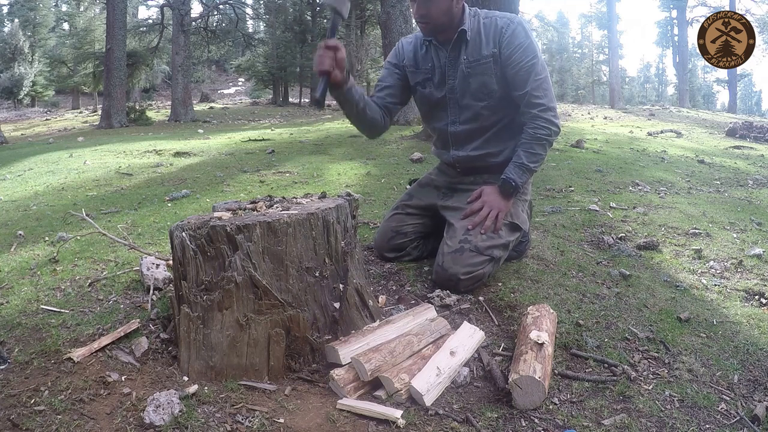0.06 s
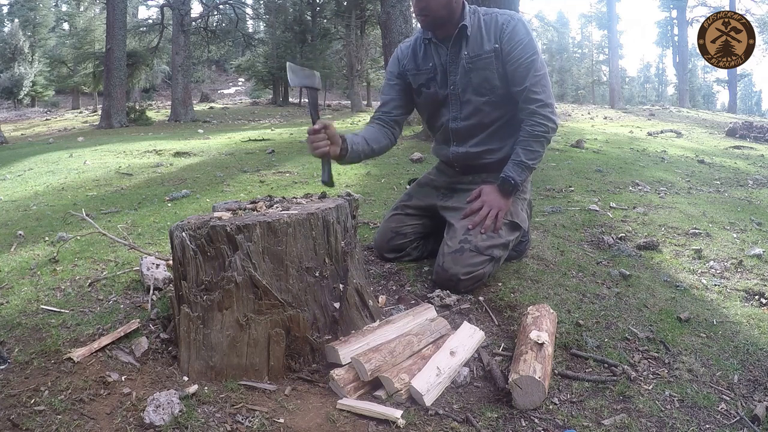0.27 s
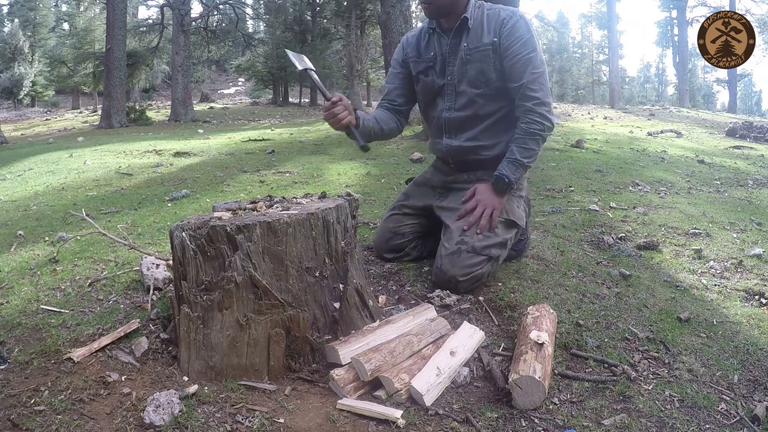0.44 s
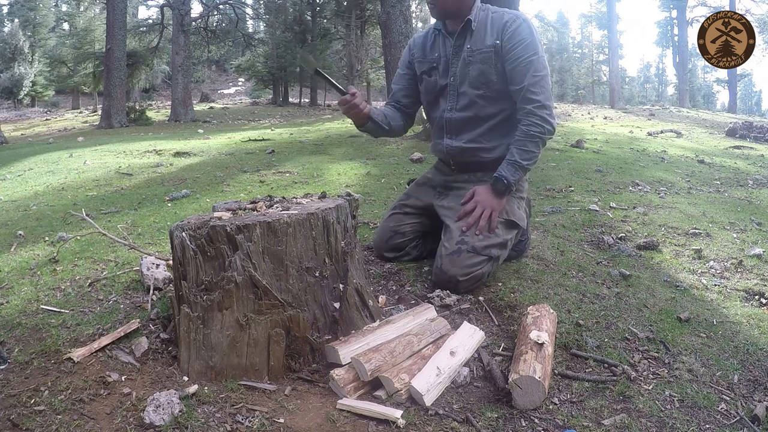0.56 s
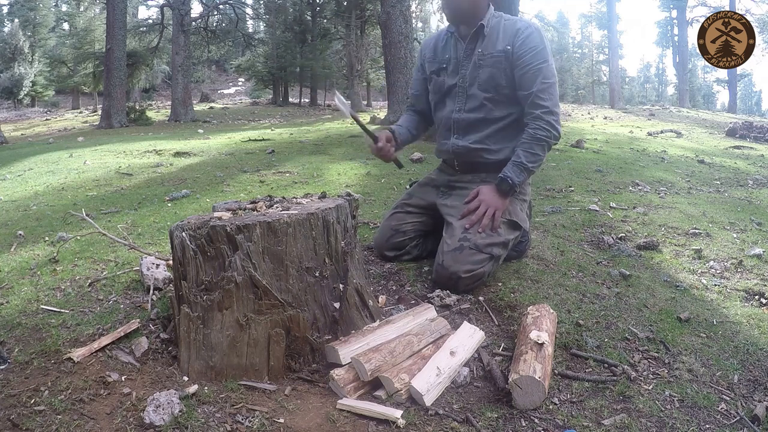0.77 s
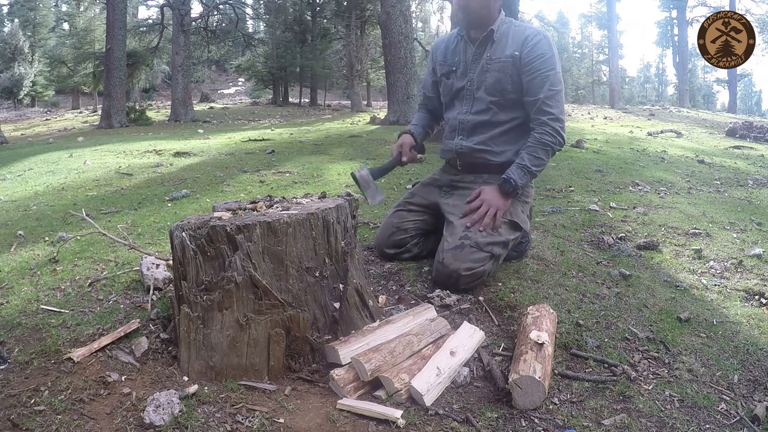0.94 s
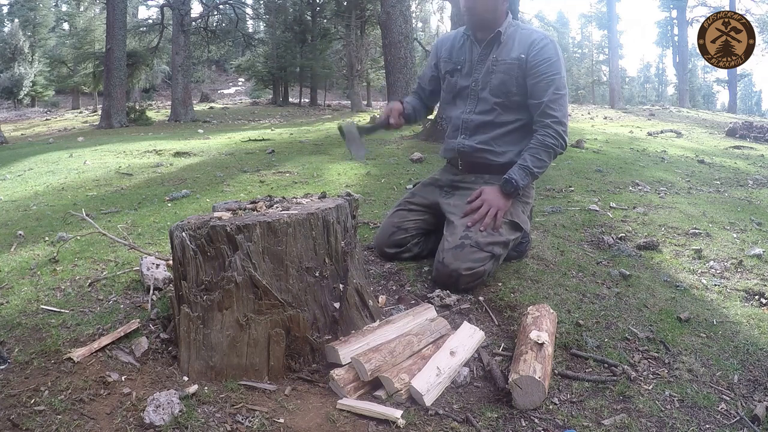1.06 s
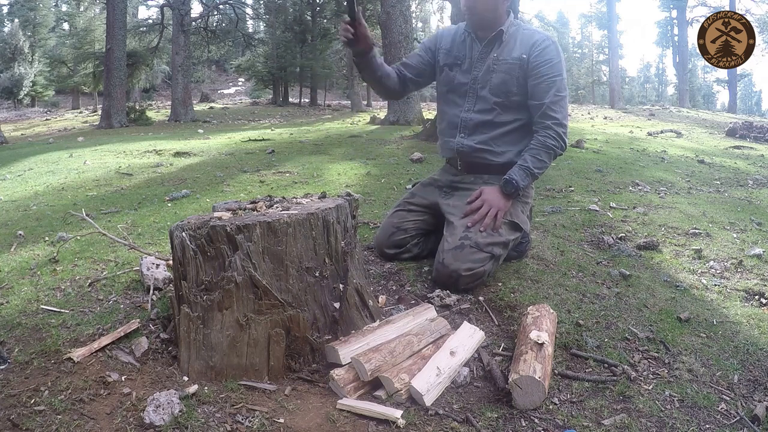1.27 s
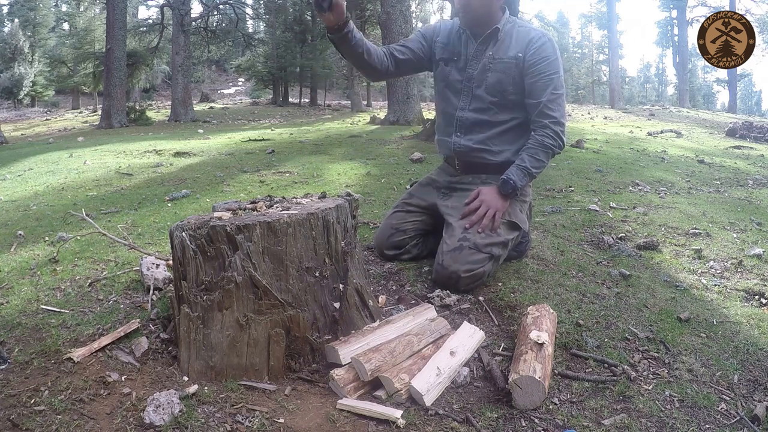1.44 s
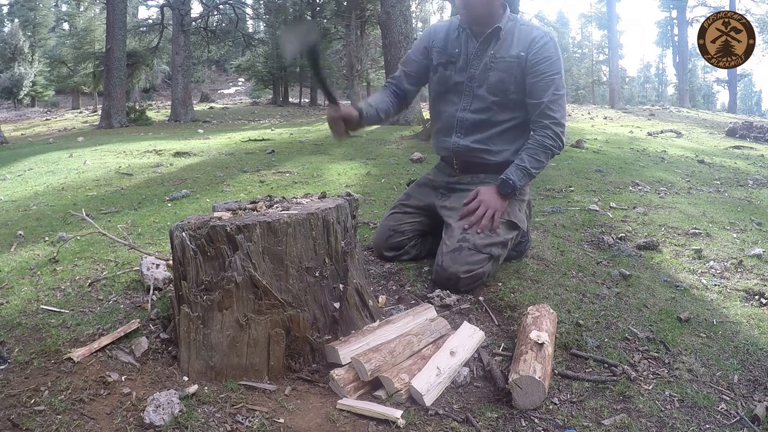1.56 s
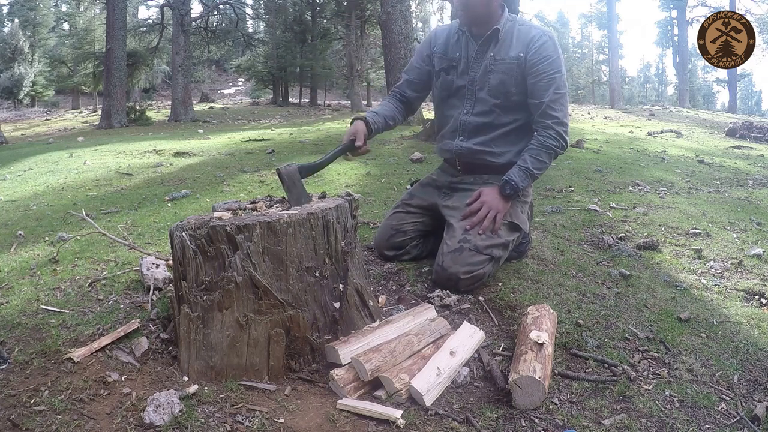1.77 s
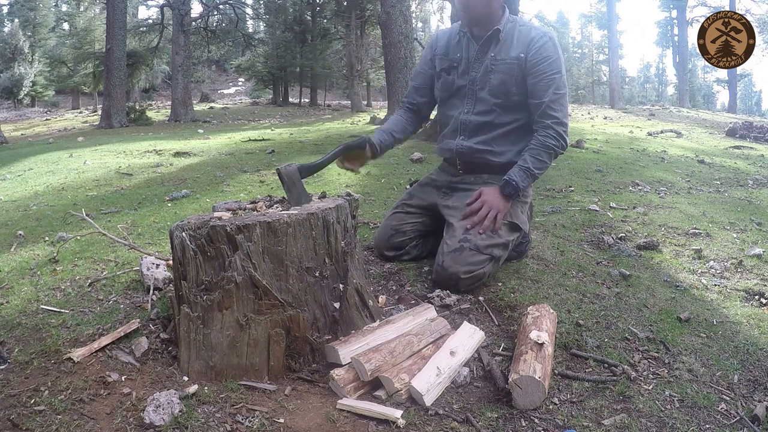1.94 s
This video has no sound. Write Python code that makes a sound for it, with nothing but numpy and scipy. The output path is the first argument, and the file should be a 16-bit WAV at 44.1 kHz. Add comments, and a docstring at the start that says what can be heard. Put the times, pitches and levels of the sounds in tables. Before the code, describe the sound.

A hatchet chops twice close to the microphone in a forest: a bright crack through a stick, then a duller bite into a stump. Both echo briefly, over low wind rumble and very faint birds.

```python
"""Two hatchet chops in a forest, close to a small camera. Wind rumbles on the microphone throughout.
At 0.2 s the first blow cracks brightly through a stick and overloads the camera; the steel rings
and trunks scatter the sound back. Far birds chirp, and eddies buffet the microphone, hardest near 1.1 s.
From 1.3 s a sleeve swishes on the swing. At 1.7 s the second blow bites into the stump and overloads
the camera again; one more bird calls over its echo."""
import sys
import numpy as np
from scipy import signal
from scipy.fft import rfft, irfft
from scipy.io import wavfile

SR = 44100
rng = np.random.default_rng(int(sys.argv[2]) if len(sys.argv) > 2 else 0)


def transcribe(signal):
    """Save signal, clipped to [-1, 1], as a 16-bit WAV file at the path in sys.argv[1]."""
    frames = np.atleast_2d(signal).T
    limited = np.clip(frames, -1, 1)
    pcm = np.round(limited * 32767).astype(np.int16)
    wavfile.write(sys.argv[1], SR, pcm)


N = 88200


def undb(db):
    """Decibels to gain."""
    return 10 ** (np.asarray(db) / 20)


def since(start_s):
    """Seconds since start_s, zero before it."""
    return np.maximum(np.arange(N) / SR - start_s, 0)


def fade(t, t60_s):
    """Exponential decay that begins when t leaves zero."""
    return (t > 0) * np.exp(-np.log(1000) * t / t60_s)


def swell(start_s, length_s):
    """Half-sine rise and fall."""
    return np.sin(np.pi * np.minimum(since(start_s) / length_s, 1))


def noise(spectrum):
    """Unit-power noise shaped by (frequency [Hz], relative level [dB]) points."""
    hz, db = np.array(spectrum).T
    bins_hz = np.maximum(np.fft.rfftfreq(N, 1 / SR), 1)
    gain = undb(np.interp(np.log(bins_hz), np.log(hz), db))
    shaped = irfft(rfft(rng.standard_normal(N)) * gain, N)
    return shaped / shaped.std()


def ring(start_s, modes, lag_rad=0):
    """Damped modes struck together; a phase lag from each to the next spreads the attack."""
    t = since(start_s)
    return sum(undb(db) * np.sin(2 * np.pi * hz * t - k * lag_rad) * fade(t, t60_s)
               for k, (hz, db, t60_s) in enumerate(modes))


# Blows: (time [s], crack level [dB], crack t60 [s], snap level [dB], wood gain [dB],
# thump gain [dB], echo gain [dB])
BLOWS = [(.2061, 0, .018, -8, 7, -3, -35), (1.696, -10, .018, -16, 6, -6, -42)]
# First instant of the split, then breaking fibres: (frequency [Hz], relative level [dB])
SNAP_SPECTRUM = [(1000, -8.5), (3000, 3), (5000, 2), (6500, -6.5), (9000, -6), (13000, -7.5),
                 (15000, -15.5)]
CRACK_SPECTRUM = [(150, -2.5), (450, -1), (1400, 1.5), (2700, 2.5), (4500, -1.5), (6200, -15.5),
                  (9000, -22.5), (15000, -26.5)]
# Split stick, struck stump, stump on the ground: (frequency [Hz], relative level [dB], t60 [s])
STICK_MODES = [(740, -19, .03), (930, -23, .022), (1315, -13, .018), (2000, -20, .02), (2640, -15, .026),
               (2950, -14, .02), (3240, -9, .018), (3780, -4, .014), (4130, -9, .017), (4540, -5, .02),
               (6130, -18, .013), (7010, -21, .016), (11250, -25, .018)]
STUMP_MODES = [(522, -15, .055), (760, -18, .016), (920, -18, .022), (1045, -21, .042), (1260, -8, .016),
               (1410, -8, .021), (1560, -16, .02), (2010, -23, .026), (2640, -23, .024), (3530, -18, .026),
               (4750, -14, .016), (5080, -9, .017), (5580, -16, .018)]
THUMP_MODES = [(45.25, -24.5, 0.2), (105, -7, 0.026), (149, -6, 0.069), (238, -11.5, 0.035),
               (320.5, -16, 0.019)]
SNAP_LENGTH_S, BITE_RISE_S, THUMP_LAG_S = .0033, .0007, .0028


def chop(blow, wood_modes, echo_spectrum):
    """One blow snaps and cracks fibres, rings the wood and thumps the stump; the forest answers."""
    start_s, crack_db, crack_t60_s, snap_db, wood_db, thump_db, echo_db = blow
    t = since(start_s)
    bite = 1 - np.exp(-t / BITE_RISE_S)
    snap = undb(snap_db) * noise(SNAP_SPECTRUM) * swell(start_s, SNAP_LENGTH_S)
    crack = undb(crack_db) * noise(CRACK_SPECTRUM) * fade(t, crack_t60_s)
    wood = undb(wood_db) * ring(start_s, wood_modes, lag_rad=np.pi / 2)
    thump = -undb(thump_db) * ring(start_s + THUMP_LAG_S, THUMP_MODES)
    echo = undb(echo_db) * forest(start_s, echo_spectrum)
    return snap + bite * (crack + wood) + thump + echo


# Late fibre breaks: (time [s], level [dB], t60 [s])
SPLINTERS = [(0.2138, -13, 0.022), (0.2194, -24, 0.0099), (1.7014, -14, 0.016)]


def splinters():
    """Fibres give way in short cracks as the blade drives on."""
    envelope = sum(undb(db) * fade(since(start_s), t60_s) for start_s, db, t60_s in SPLINTERS)
    return noise(CRACK_SPECTRUM) * envelope


# Steel blade: (frequency [Hz], level [dB], t60 [s])
BLADE_MODES = [(3935, -29, .16), (7010, -52, .24), (11350, -60, .14)]


def blade():
    """The steel rings on after the first blow only."""
    return ring(start_s=BLOWS[0][0], modes=BLADE_MODES)


# Forest echo, one spectrum per blow: (frequency [Hz], relative level [dB])
ECHO_SPECTRA = [
    [(120, 3.5), (300, -5), (600, -8), (1000, -7), (1500, -0.5), (2400, -2.5), (4000, 0), (4900, -5),
     (6000, -13.5), (7200, -17), (9000, -25.5), (14000, -30.5)],
    [(120, -2), (300, -3), (400, -5), (530, -1), (780, -12), (1100, -1), (1420, 5), (1850, -9.5),
     (2400, -8), (4000, -9.5), (5100, -4.5), (6200, -14.5), (14000, -31.5)],
]
ECHO_DELAY_S, ECHO_RISE_S, TRUNK_SCATTER_DB = .022, .003, 2.5
GROUND_DB, GROUND_T60_S = -2, .056
NEAR_DB, NEAR_T60_S = -5, .079
FAR_DB, FAR_T60_S, TREBLE_T60_S, TREBLE_HZ = -6.5, .76, .48, 3780


def forest(start_s, spectrum):
    """Scatter from the ground, returns from near trunks, then a long tail that loses its treble first."""
    t = since(start_s + ECHO_DELAY_S)
    scatter = noise(spectrum)
    scatter *= undb(TRUNK_SCATTER_DB * noise([(100, -1), (300, -5.5), (900, -68)]))  # level flutter
    low = signal.sosfiltfilt(signal.butter(2, TREBLE_HZ, fs=SR, output="sos"), scatter)
    treble = scatter - low
    ground = undb(GROUND_DB) * scatter * fade(since(start_s), GROUND_T60_S)
    near = undb(NEAR_DB) * scatter * fade(t, NEAR_T60_S)
    far = undb(FAR_DB) * (low * fade(t, FAR_T60_S) + treble * fade(t, TREBLE_T60_S))
    rise = 1 - np.exp(-t / ECHO_RISE_S)
    return ground + (near + far) * rise


# Wind rumble: (frequency [Hz], relative level [dB])
WIND_SPECTRUM = [(12, -14.5), (25, 3.5), (40, 3), (60, -2.5), (85, -18), (125, -27), (200, -50), (400, -74)]
# Gusts: (time [s], level [dB])
GUSTS = [(0.0, -53), (0.05, -33.5), (0.12, -34), (0.22, -49.5), (0.24, -33), (0.39, -38), (0.42, -25),
         (0.48, -41), (1.04, -37), (1.06, -29.5), (1.38, -54.5), (1.5, -30.5), (1.66, -39), (1.7, -36),
         (1.77, -44.5), (2.0, -58)]
# Eddies: (time [s], relative level [dB], frequency [Hz])
EDDIES = [(0.295, -20.5, 33.7), (0.41, -31, 42.3), (0.9, -33, 36), (1.056, -11.5, 47), (1.081, -21.5, 82),
          (1.099, -20, 57.3), (1.129, -17.5, 56.6), (1.433, -33, 39), (1.487, -38.5, 43)]
EDDY_T60_S, EDDY_RISE_S = .052, .0035


def wind():
    """A gusting rumble with single eddies that thud on the microphone."""
    gust_db = np.interp(since(0), *np.array(GUSTS).T)
    out = noise(WIND_SPECTRUM) * undb(gust_db)
    for start_s, db, hz in EDDIES:
        t = since(start_s)
        rise = 1 - np.exp(-(t / EDDY_RISE_S) ** 2)
        out += 2 * undb(db) * np.sin(2 * np.pi * hz * t) * fade(t, EDDY_T60_S) * rise
    return out


# Sleeve strokes: (centre time [s], length [s], level [dB])
SWISHES = [(1.298, 0.043, -68.5), (1.502, 0.04, -55.5), (1.6, 0.033, -66), (1.686, 0.033, -60)]
# Cloth friction: (frequency [Hz], relative level [dB])
CLOTH_SPECTRUM = [(800, -30), (1850, -20), (2150, 0), (3300, -1), (3800, -12), (6000, -21), (12000, -36)]


def sleeve():
    """Cloth brushes as the arm swings."""
    envelope = sum(undb(db) * swell(centre_s - length_s / 2, length_s)
                   for centre_s, length_s, db in SWISHES)
    return noise(CLOTH_SPECTRUM) * envelope


# Bird notes: (time [s], length [s], start pitch [Hz], middle pitch [Hz], end pitch [Hz], level [dB])
CHIRPS = [(.38, 0.056, 5500, 5620, 4840, -71), (0.591, 0.028, 3350, 3470, 3230, -65.5),
          (0.75, 0.022, 3750, 3970, 3970, -67), (1.868, 0.11, 4450, 3880, 3880, -63)]


def birds():
    """Distant whistles, each gliding through three pitches."""
    out = np.zeros(N)
    for start_s, length_s, *pitches_hz, db in CHIRPS:
        glide = np.polyfit([0, .5, 1], pitches_hz, 2)
        hz = np.polyval(glide, np.minimum(since(start_s) / length_s, 1))
        out += undb(db) * swell(start_s, length_s) * np.sin(2 * np.pi * np.cumsum(hz) / SR)
    return out


# Still air and a tick: (frequency [Hz], relative level [dB])
AIR_SPECTRUM = [(120, -2), (200, -4.5), (300, -7), (600, -10), (1200, -13), (2200, -15), (4000, -15),
                (6500, -21), (10000, -25), (15000, -28)]
TICK_SPECTRUM = [(6000, -32), (11000, 1), (13500, 4), (15000, -14)]
AIR_DB, TICK_DB = -62.5, -65
EARLIER_ECHO_DB, EARLIER_ECHO_T60_S = -59, .9
WHINE_HZ, WHINE_DB = 8794, -82


def background():
    """Still air, the dying echo of an earlier blow, the camera's thin whine and one tiny tick."""
    t = since(0)
    air = undb(AIR_DB) * noise(AIR_SPECTRUM)
    echo = undb(EARLIER_ECHO_DB) * noise(CRACK_SPECTRUM) * fade(t, EARLIER_ECHO_T60_S)
    whine = undb(WHINE_DB) * np.sin(2 * np.pi * WHINE_HZ * t)
    tick = undb(TICK_DB) * noise(TICK_SPECTRUM) * swell(start_s=1.361, length_s=.008)
    return air + echo + whine + tick


def scene():
    """Mono sum at the microphone."""
    stick_chop = chop(BLOWS[0], STICK_MODES, ECHO_SPECTRA[0])
    stump_chop = chop(BLOWS[1], STUMP_MODES, ECHO_SPECTRA[1])
    hatchet = stick_chop + stump_chop + splinters() + blade()
    return (hatchet + wind() + sleeve() + birds() + background())[None]


CEILING, KNEE_ORDER, LOWPASS_HZ = .98, 10, 15100


def record(dry):
    """The camera flattens the loudest peaks and cuts the top treble."""
    clipped = dry / (1 + np.abs(dry / CEILING) ** KNEE_ORDER) ** (1 / KNEE_ORDER)
    lowpass = signal.ellip(8, .2, 70, LOWPASS_HZ, fs=SR, output="sos")
    return signal.sosfilt(lowpass, clipped)


dry = scene()
out = record(dry)
transcribe(out)
```